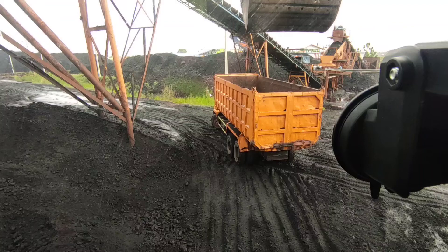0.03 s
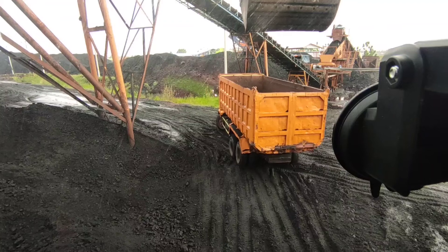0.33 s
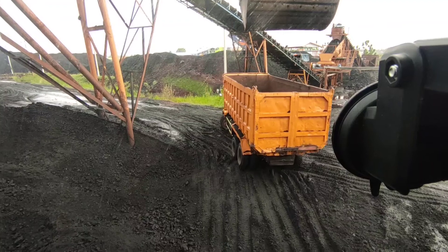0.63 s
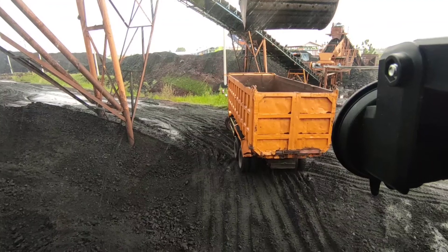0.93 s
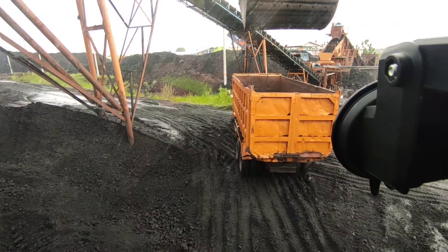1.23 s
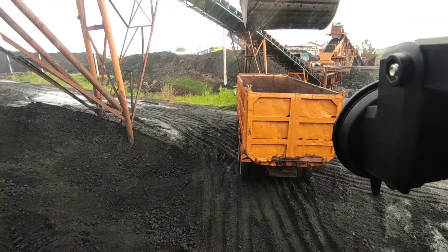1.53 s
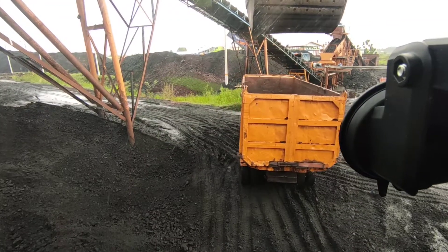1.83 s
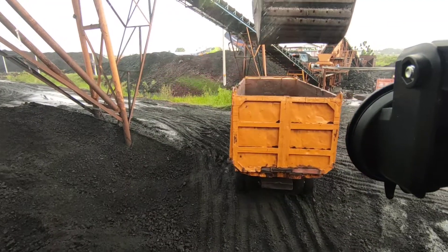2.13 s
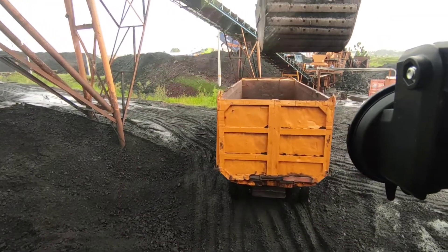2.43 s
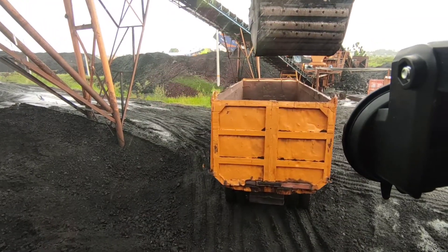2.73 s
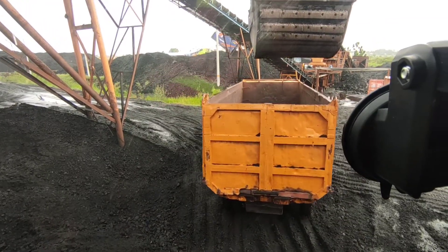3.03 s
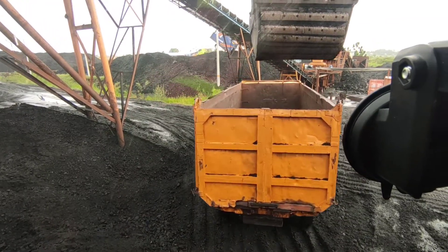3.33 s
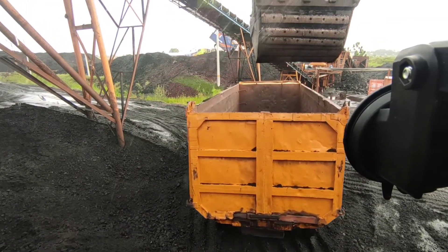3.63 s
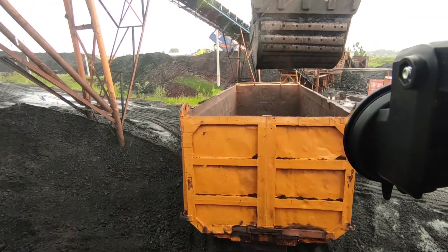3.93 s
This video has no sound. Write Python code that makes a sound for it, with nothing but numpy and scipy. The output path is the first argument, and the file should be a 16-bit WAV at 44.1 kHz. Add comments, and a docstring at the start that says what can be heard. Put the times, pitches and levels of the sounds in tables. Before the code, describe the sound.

An excavator's diesel engine idles, then revs up to a steady drone, heard inside the cab.

```python
"""Excavator cab, throttling up.

The diesel idles, then runs up to working speed. Its drone and the pump drive's whine follow the
crankshaft, over a roar coloured by the cab. A loose fitting ticks twice, hydraulic oil hisses as
the boom moves, and the cab takes two dull jolts."""
import sys
import numpy as np
from scipy import signal
from scipy.fft import rfft, irfft
from scipy.io import wavfile

SR = 44100
rng = np.random.default_rng(int(sys.argv[2]) if len(sys.argv) > 2 else 0)


def unload_audio(sound):
    """Save the sound as a 16-bit wav file, at the path given as the first command line argument."""
    columns = np.transpose(np.atleast_2d(sound))
    # keep every value between -1 and 1, then stretch to whole-number steps
    steps = np.round(np.clip(columns, -1, 1) * 32767)
    wavfile.write(sys.argv[1], SR, steps.astype(np.int16))


N = 176400
T = np.arange(N) / SR
IDLE_HZ, WORK_HZ = 19.2, 30.4  # crank speed
# cab stereo field (frequency [Hz], left minus right [dB], correlation [-1..1])
CAB_FIELD = [(60, 11, .93), (200, 10.5, 0.82), (380, 13.5, 0.94), (676, 10, 0.52), (950, 10, 0.43),
             (1300, 4.5, 0.078), (2340, 9.5, -0.14), (4400, 3, 0.025), (8000, 3, -0.054),
             (14900, -2.5, 0.052)]


def from_db(db):
    """Decibels to gain."""
    return 10 ** (np.asarray(db) / 20)


def in_time(rows):
    """Breakpoint curve at every sample."""
    return np.interp(T, *np.transpose(rows))


def at_hz(rows, hz, column=1):
    """Table column interpolated over log frequency."""
    rows = np.array(rows)
    return np.interp(np.log(hz + 1e-9), np.log(rows[:, 0]), rows[:, column])


def pan(db):
    """Left and right gains, mean 1."""
    ratio = np.atleast_1d(from_db(db))
    return np.array([2 * ratio, np.full_like(ratio, 2)]) / (1 + ratio)


def flutter(width_hz):
    """Slow complex noise, rms 1: wobbles level and phase."""
    step, run_in = 40, 2000
    pole = np.exp(-2 * np.pi * width_hz * step / SR)
    white = [1, 1j] @ rng.standard_normal((2, N // step + run_in + 2))
    slow = signal.lfilter([1], [1, -2 * pole, pole * pole], white)[run_in:]
    return np.interp(np.arange(N) / step, np.arange(len(slow)), slow / np.std(slow))


def cab_noise(spectrum):
    """Noise of a given density in the cab's stereo field."""
    hz = np.arange(N // 2 + 1) * SR / N
    mid, side = rfft(rng.standard_normal((2, N)))
    correlation = np.clip(at_hz(CAB_FIELD, hz, column=2), -1, 1)
    stereo = np.sqrt(1 + correlation) * mid + np.sqrt(1 - correlation) * side * [[1], [-1]]
    skirts = np.minimum(1, hz / spectrum[0][0]) ** 2 / np.maximum(1, hz / spectrum[-1][0]) ** 2
    density = from_db(at_hz(spectrum, hz)) * skirts
    return irfft(stereo * pan(at_hz(CAB_FIELD, hz)) * density, N) * np.sqrt(SR) / 2


def partial(hz, db, rough):
    """Stereo tone on a pitch curve; rough is the fluttering part of its rms."""
    # (frequency [Hz], left minus right [dB], right phase lead [rad])
    placement = [(80.4, 10.5, 0.17), (250, 9, 0.25), (310, 16, 0.54), (497, 15.5, 0.28), (625, 14.5, 0.92),
                 (946, 14.5, 0.99), (971, 7, 2.2), (1150, 6.5, 1.2)]
    rough = np.clip(rough, 0, 1)
    wobble = np.sqrt(1 - rough ** 2) + rough * flutter(width_hz=16)
    left = wobble * np.exp(2j * np.pi * (np.cumsum(hz) / SR + rng.random()))
    right = left * np.exp(1j * at_hz(placement, hz, column=2))
    return np.sqrt(2) * from_db(db) * np.real([left, right]) * pan(at_hz(placement, hz))


def whistle(hz, width_hz):
    """Narrow noise band, independent in each ear."""
    carrier = np.exp(2j * np.pi * np.cumsum(np.broadcast_to(hz, N)) / SR)
    return np.sqrt(2) * np.real([carrier * flutter(width_hz), carrier * flutter(width_hz)])


def drone(crank_hz, idling):
    """Crank orders whose balance shifts from idle to work."""
    # (order [x crank], idle level [dB], working level [dB], roughness [0..1])
    partials = [(2.007, -57, -47.5, 0.1), (4.032, -37.5, -39, 0.02), (6.056, -54, -52, 0.4),
                (9.05, -61, -50, 0.5), (12.25, -53.5, -35, 0.64), (13.23, -67.5, -41.5, 0),
                (18.04, -57, -48.5, 0), (20.03, -46.5, -58.5, 0.2), (22.96, -47, -47.5, 0.7),
                (25.7, -53.5, -54, 0.4), (27.9, -54, -55, 0.1), (35.7, -53, -54.5, 0.1),
                (37.3, -66, -56.5, 0.8), (45.5, -54, -67, 0), (55.9, -57.5, -75.5, 0.4),
                (59.5, -60.5, -74.5, 0), (61.2, -61.5, -77, 0.1), (64.15, -57.5, -66, 0.8)]
    return sum(partial(order * crank_hz, work_db + idling * (idle_db - work_db), rough)
               for order, idle_db, work_db, rough in partials)


def exhaust_hum(crank_hz):
    """Twice the firing rate; holds until the run-up carries it past the cab's resonance."""
    # (time [s], level [dB])
    level = [(.2, -34), (1.28, -35), (1.335, -33), (1.41, -37.5), (1.46, -64), (1.7, -48.5), (4, -47.5)]
    return partial(8 * crank_hz, in_time(level), rough=0.056)


def throb(hz=50.25):
    """A deep tone beats against the drone."""
    # (time [s], level [dB])
    level = [(1.2, -57.5), (1.75, -44), (2.2, -45), (2.9, -42), (3.3, -52), (4, -51)]
    return partial(np.full(N, hz), in_time(level), rough=0.35)


def pump_whine(crank_hz):
    """Three pump drive partials swell and sink as they sweep through cab resonances."""
    # each partial (time [s], level [dB])
    low = [(.2, -38.5), (1.08, -38.5), (1.15, -47), (1.23, -44), (1.27, -35), (1.315, -35), (1.35, -26.5),
           (1.39, -30), (1.42, -41), (1.46, -39), (1.5, -28), (1.7, -26.5), (1.76, -32.5), (1.8, -25.5),
           (2.6, -25.7), (3.25, -24.6), (4, -24.8)]
    mid = [(.2, -30), (1.085, -30), (1.12, -41), (1.16, -40), (1.21, -39.5), (1.26, -51), (1.315, -35.5),
           (1.345, -36.5), (1.37, -27), (1.4, -45), (1.439, -31.5), (1.55, -50), (1.66, -41), (2.5, -37.5),
           (3, -40), (4, -39.5)]
    top = [(.2, -46), (1.03, -46.5), (1.15, -50), (1.275, -50), (1.325, -36), (1.36, -46), (1.46, -51),
           (1.55, -67), (1.9, -71)]
    accel_hz_per_s = np.abs(np.gradient(crank_hz)) * SR
    return sum(partial(order * crank_hz, in_time(level), rough=0.1 + 0.007 * accel_hz_per_s * order / 32)
               for order, level in [(16, low), (32, mid), (48, top)])


def gears(crank_hz):
    """Faint lines on every third crank order, of random phase in each ear."""
    # (frequency at working speed [Hz], level [dB])
    spectrum = [(1300, -70), (1700, -78), (2100, -73), (3100, -75.5), (4500, -83)]
    turns = np.cumsum(crank_hz) / SR
    out = np.zeros((2, N))
    for order in range(42, 162, 3):
        hz = order * WORK_HZ
        db = at_hz(spectrum, hz) + rng.standard_normal()
        line = np.sqrt(2) * np.cos(2 * np.pi * (order * turns + rng.random((2, 1))))
        out += from_db(db) * pan(at_hz(CAB_FIELD, hz)) * line
    return out


def engine_whistles(crank_hz, idling):
    """Two thin whistles: one rises with the crank, one holds pitch and grows with effort."""
    rising = from_db(-71) * whistle(695.5 * crank_hz, width_hz=35)
    steady = from_db(-71 - 4.5 * idling) * whistle(hz=5565, width_hz=40)
    return rising + steady


def cab_rumble():
    """Low noise of the cab, swelling with the run-up."""
    # (frequency [Hz], density [dB/Hz])
    spectrum = [(42, -63), (52, -57.5), (62, -62.5), (82, -68), (105, -62.5), (140, -62), (180, -52.5),
                (235, -68.5), (330, -70.5)]
    # (time [s], gain [dB])
    swell = [(.2, -6), (1.2, -5.5), (1.55, -2), (1.85, -1), (2.35, 1), (2.85, -0.5), (3.3, -2), (4, -2.5)]
    return cab_noise(spectrum) * from_db(in_time(swell))


def roar(idling, idle_db=-1):
    """Engine noise through the cab panels."""
    # (frequency [Hz], density [dB/Hz])
    spectrum = [(200, -71), (310, -67.5), (385, -61), (462, -55.5), (515, -65.5), (565, -57.5), (645, -66),
                (700, -66.5), (860, -68), (990, -81.5), (1120, -75), (1350, -86), (2000, -102)]
    return cab_noise(spectrum) * from_db(idle_db * idling)


def clatter(crank_hz, idling, idle_db=-2):
    """Combustion noise; flickers, and pulses at four firings a turn."""
    # (frequency [Hz], density [dB/Hz])
    spectrum = [(700, -100), (1350, -84.5), (1570, -82), (1700, -91.5), (2000, -83.5), (2600, -87.5),
                (3800, -94), (6000, -99), (10000, -106), (15000, -103)]
    firing = np.cos(2 * np.pi * 4 * np.cumsum(crank_hz) / SR)
    flicker_db = 1.28 * flutter(width_hz=20).real
    return cab_noise(spectrum) * from_db(idle_db * idling + flicker_db) * (1 + 0.078 * firing)


def oil_hiss():
    """Oil hisses in the valves, louder with flow."""
    # (frequency [Hz], density [dB/Hz])
    spectrum = [(2000, -112), (4500, -96.5), (7000, -94.5), (9000, -94), (11500, -97.5), (14500, -95.5)]
    # (time [s], gain [dB])
    flow = [(.2, -17.5), (1.1, -13), (1.7, -8), (1.9, -3), (2.1, 0), (2.45, -1), (2.9, -9.5), (3.3, -8),
            (3.65, -8), (3.95, -0.5)]
    return cab_noise(spectrum) * from_db(in_time(flow))


def fitting_ticks(rise_s=0.0048):
    """A loose fitting ticks: short, scratchy noise bursts."""
    # (time [s], gain [dB], low edge [Hz], high edge [Hz])
    ticks = [(0.355, -45.5, 3600, 14000), (.839, -35, 1900, 3100)]
    out = np.zeros((2, N))
    for start_s, db, low_hz, high_hz in ticks:
        age = np.maximum(T - start_s, 0) / rise_s
        band = signal.butter(1, [low_hz, high_hz], "band", fs=SR, output="sos")
        out += from_db(db) * age * np.exp(1 - age) * signal.sosfilt(band, rng.standard_normal((2, N)))
    return out


def flares(crank_hz):
    """Crank orders ring briefly as the rising speed crosses resonances."""
    # (order [x crank], peak time [s], 1/e half width [s], level [dB])
    crossings = [(23.94, 1.52, 0.16, -37.5), (5.98, 1.77, 0.049, -34), (12, 1.78, 0.055, -36),
                 (20.06, 1.6, 0.11, -47), (65.4, 2.92, 0.079, -59)]
    return sum(partial(order * crank_hz, db, rough=0.2) * np.exp(-((T - peak_s) / half_s) ** 2)
               for order, peak_s, half_s, db in crossings)


def boom_valve(ramp_s=0.14):
    """The boom valve whistles while open."""
    # (opens [s], shut [s])
    spans = [(1.72, 2.86), (3.62, 5.3)]
    # (frequency [Hz], width [Hz], level [dB])
    bands = [(7880, 70, -70.5), (8620, 130, -68)]
    opening = sum(np.clip(np.minimum(T - start_s, end_s - T) / ramp_s, 0, 1) for start_s, end_s in spans)
    return opening * sum(whistle(hz, width_hz) * from_db(db) for hz, width_hz, db in bands)


def cab_jolts(cutoff_hz=180):
    """Two soft blows, each with a weaker rebound, ring the cab's low modes."""
    # (time [s], gain [dB])
    blows = [(2.469, -23), (2.583, -32), (2.678, -21.5), (2.775, -36.5)]
    # (frequency [Hz], gain [dB], t60 [s])
    modes = [(52, 0.5, 0.32), (70.5, -7, 0.127), (109, 2, 0.095)]
    ring = np.zeros(N)
    for start_s, db in blows:
        age_s = np.maximum(T - start_s, 0)
        for hz, mode_db, t60_s in modes:
            ring -= from_db(db + mode_db - 60 * age_s / t60_s) * np.sin(2 * np.pi * hz * age_s)
    soften = signal.butter(2, cutoff_hz, fs=SR, output="sos")
    return signal.sosfilt(soften, ring) * pan(CAB_FIELD[0][1])


def scene():
    """Stereo mix at the driver's seat."""
    # (time [s], crank speed [Hz])
    run_up = [(0, 19.2), (1.1, 19.22), (1.24, 20.5), (1.3, 22.6), (1.4, 26.7), (1.49, 28.2), (1.61, 28.85),
              (1.75, 29.78), (1.87, 30.17), (2.3, 30.23), (2.52, 30.4), (2.85, 30.5), (4, 30.48)]
    crank_hz = in_time(run_up)
    idling = np.clip((WORK_HZ - crank_hz) / (WORK_HZ - IDLE_HZ), 0, 1)
    low_tones = drone(crank_hz, idling) + exhaust_hum(crank_hz) + throb()
    high_tones = pump_whine(crank_hz) + gears(crank_hz) + engine_whistles(crank_hz, idling)
    noises = cab_rumble() + roar(idling) + clatter(crank_hz, idling) + oil_hiss()
    events = fitting_ticks() + flares(crank_hz) + boom_valve() + cab_jolts()
    return low_tones + high_tones + noises + events


def record(dry):
    """Quick fade-in, 4 ms fade-out, band limits."""
    # (time [s], gain [dB])
    fade_in = [(0, -85), (.125, -76), (.135, -29.5), (.18, -24.5), (.205, -4.5), (.23, -1.5), (.27, 2)]
    low_hz, high_hz, trim_db = 39.6, 15400, -1
    low_cut = signal.butter(4, low_hz, "high", fs=SR, output="sos")
    high_cut = signal.ellip(12, 0.1, 90, high_hz, fs=SR, output="sos")
    fade_out = np.minimum(1, (T[-1] - T) / 0.004)
    faded = dry * fade_out * from_db(trim_db + in_time(fade_in))
    return signal.sosfilt(np.vstack([low_cut, high_cut]), faded)


dry = scene()
out = record(dry)
unload_audio(out)
```